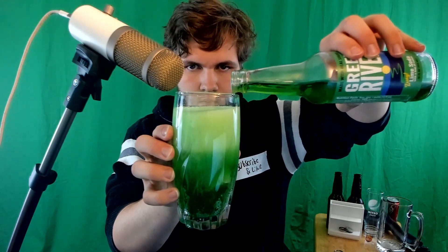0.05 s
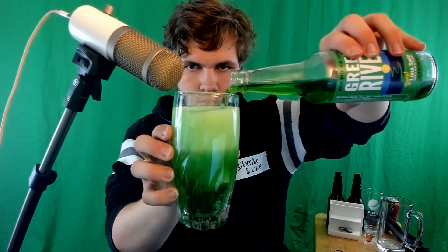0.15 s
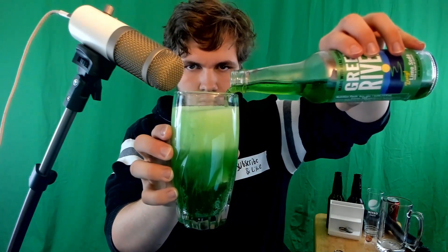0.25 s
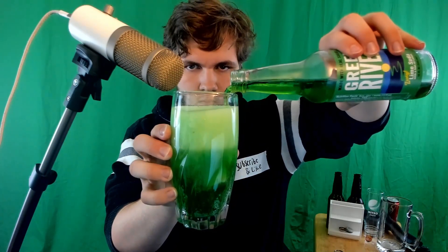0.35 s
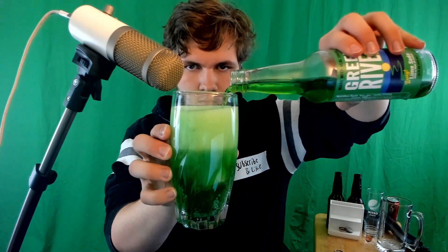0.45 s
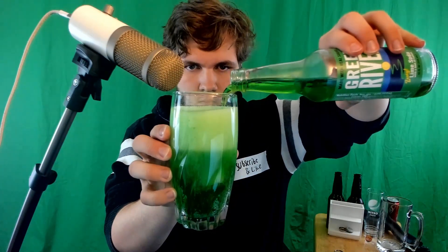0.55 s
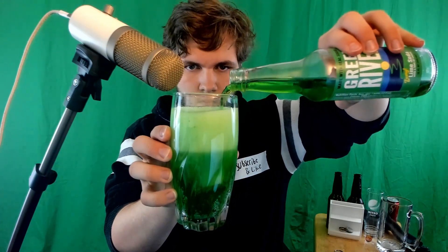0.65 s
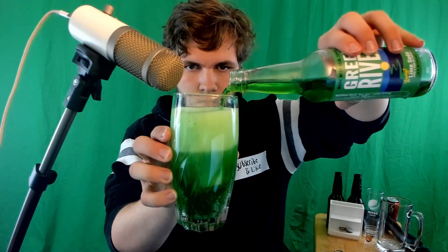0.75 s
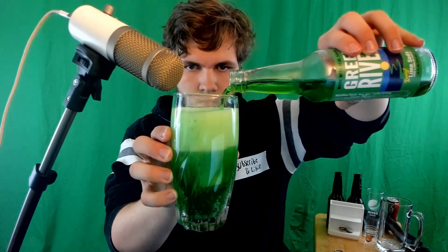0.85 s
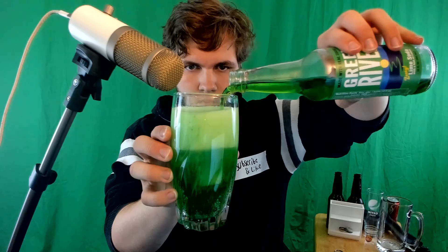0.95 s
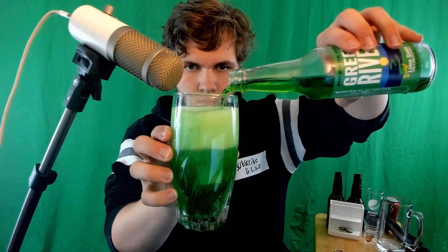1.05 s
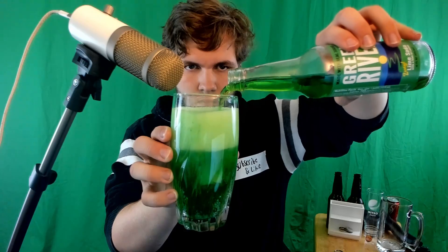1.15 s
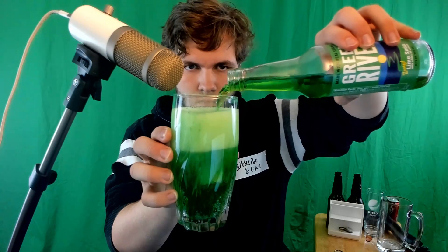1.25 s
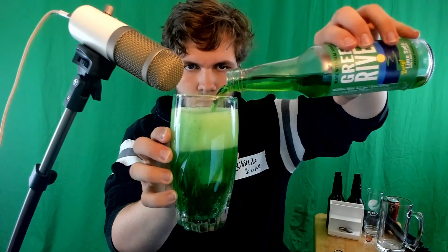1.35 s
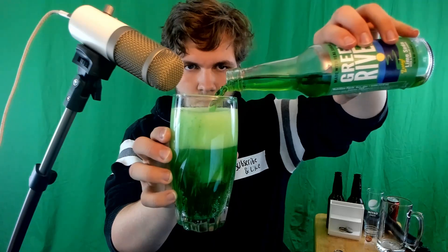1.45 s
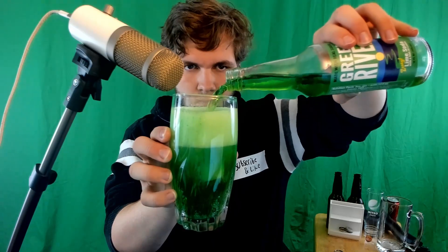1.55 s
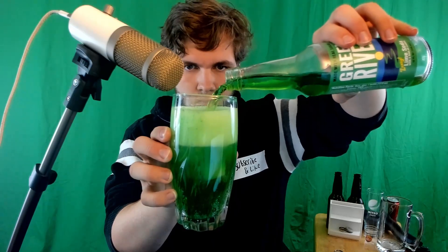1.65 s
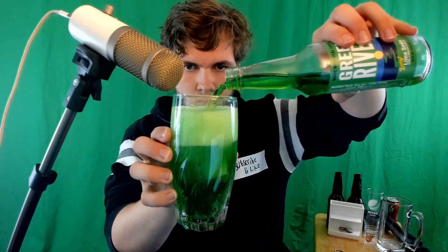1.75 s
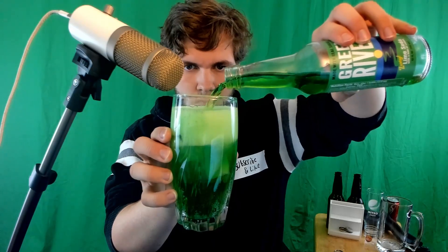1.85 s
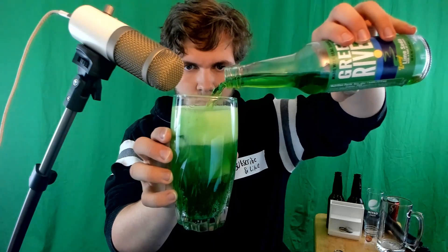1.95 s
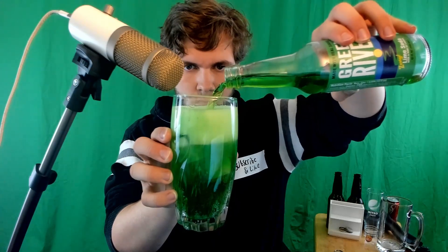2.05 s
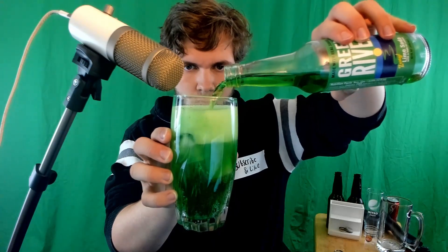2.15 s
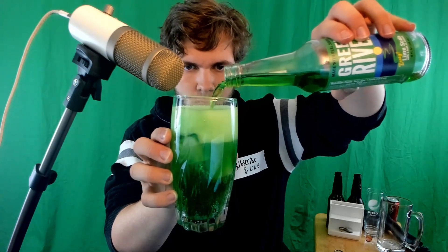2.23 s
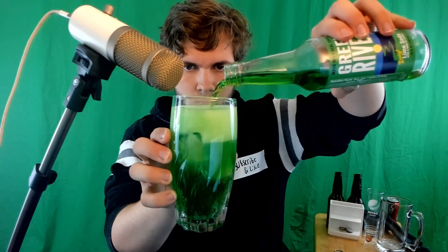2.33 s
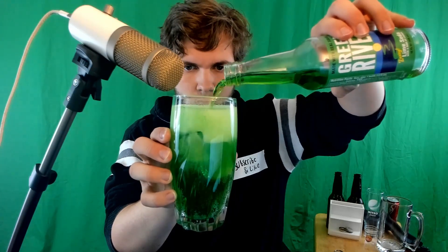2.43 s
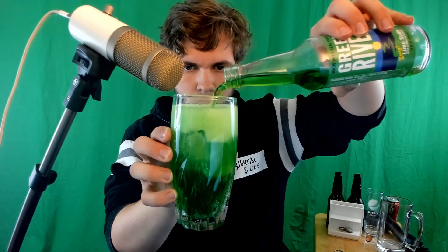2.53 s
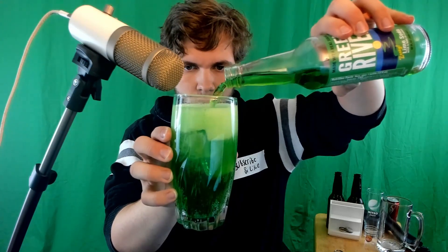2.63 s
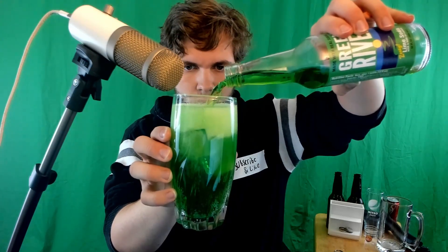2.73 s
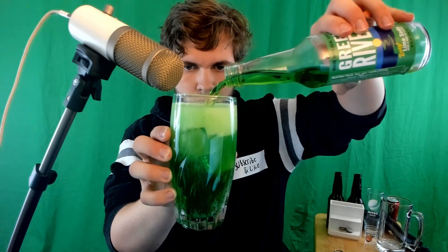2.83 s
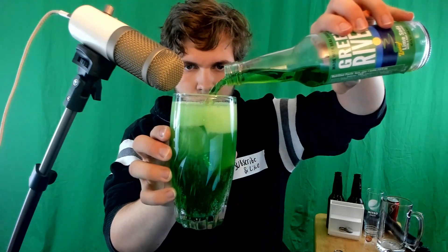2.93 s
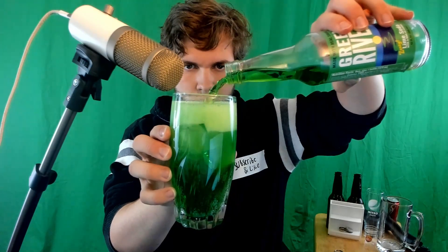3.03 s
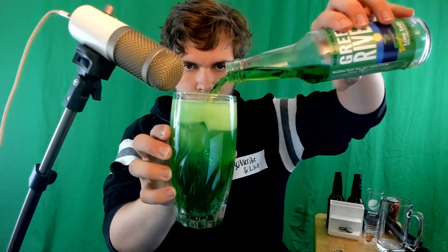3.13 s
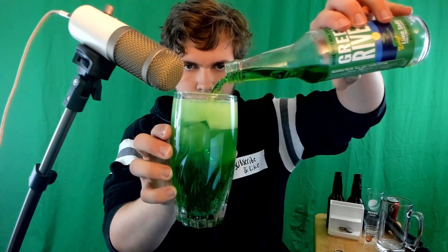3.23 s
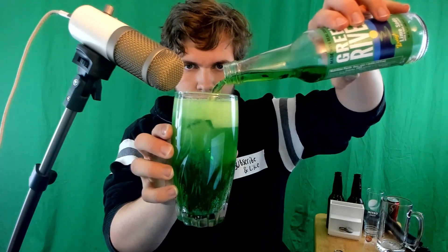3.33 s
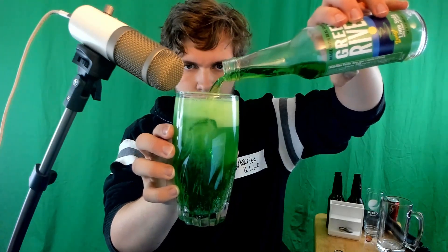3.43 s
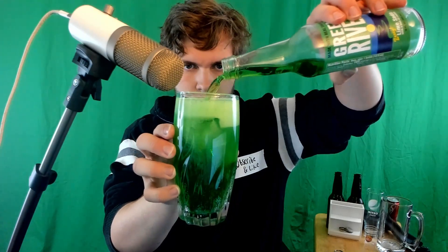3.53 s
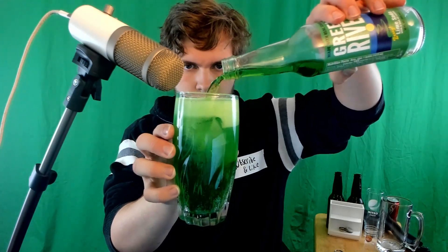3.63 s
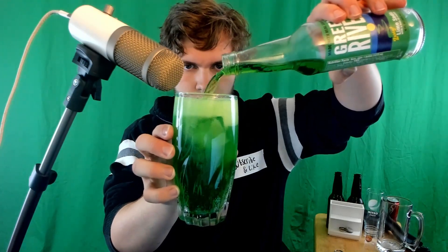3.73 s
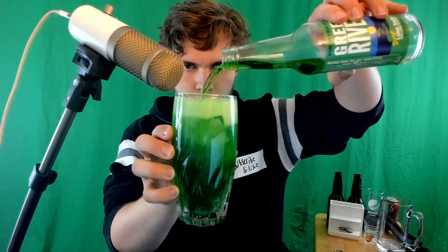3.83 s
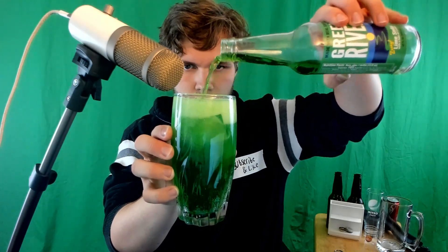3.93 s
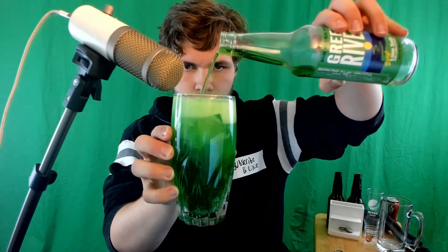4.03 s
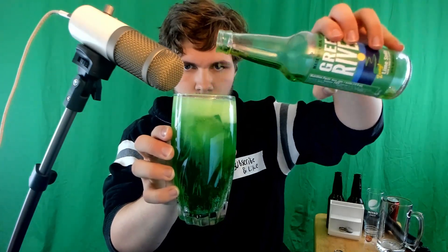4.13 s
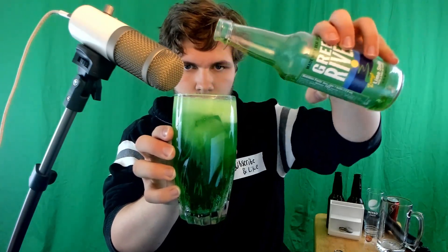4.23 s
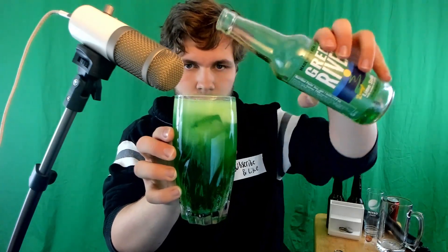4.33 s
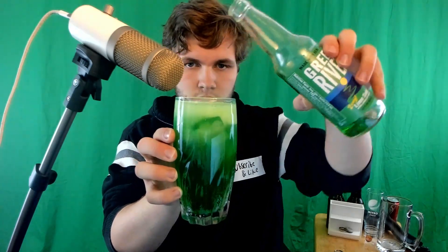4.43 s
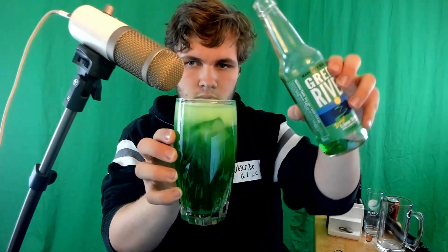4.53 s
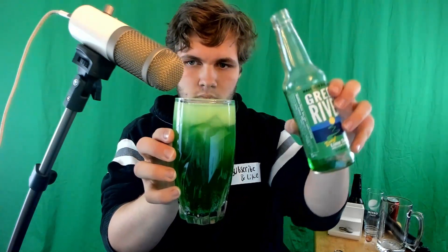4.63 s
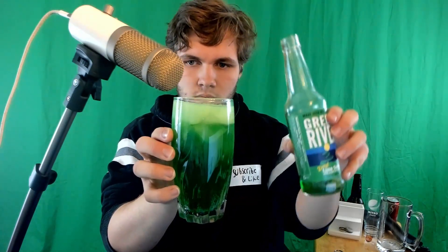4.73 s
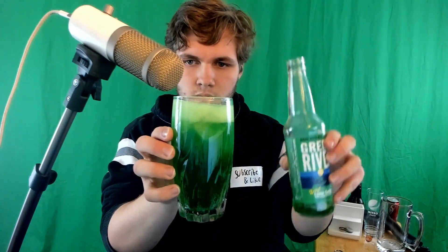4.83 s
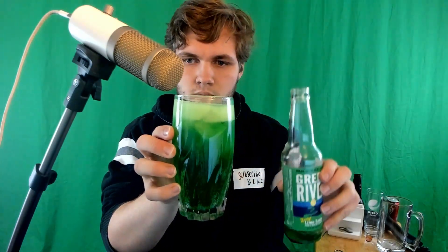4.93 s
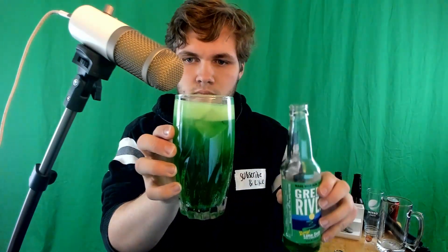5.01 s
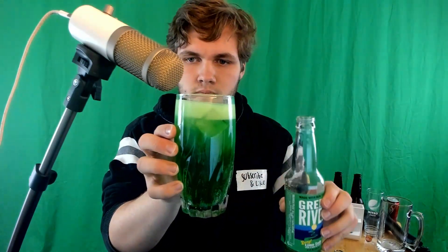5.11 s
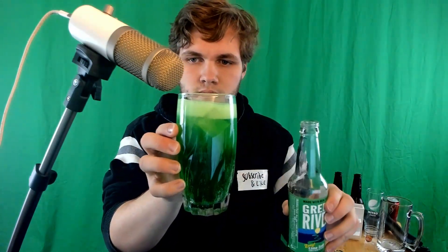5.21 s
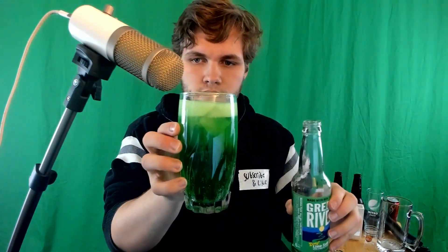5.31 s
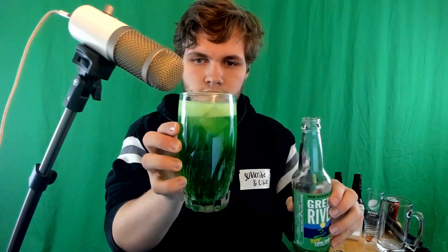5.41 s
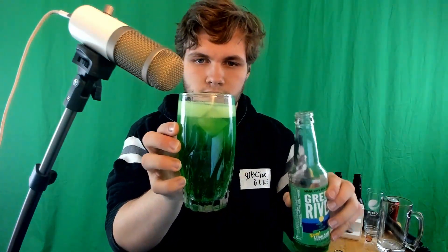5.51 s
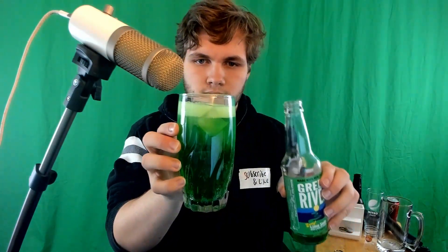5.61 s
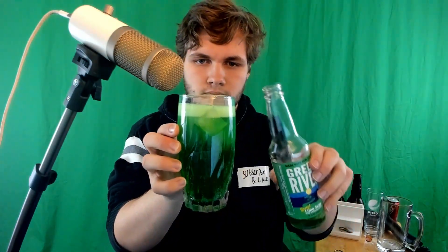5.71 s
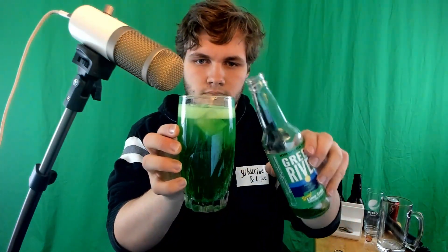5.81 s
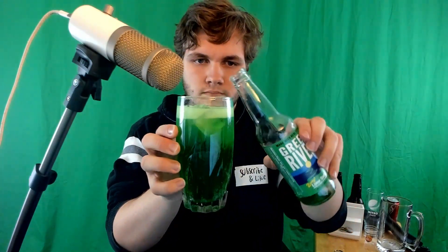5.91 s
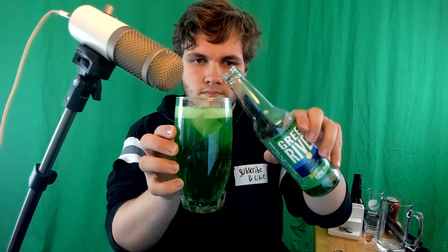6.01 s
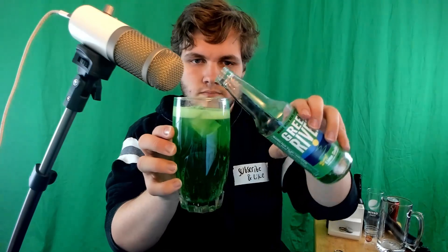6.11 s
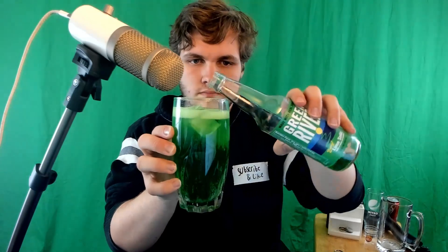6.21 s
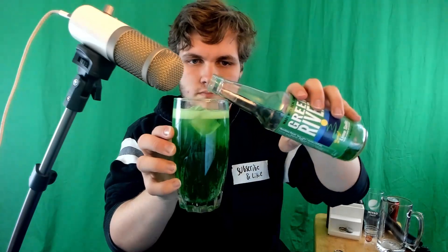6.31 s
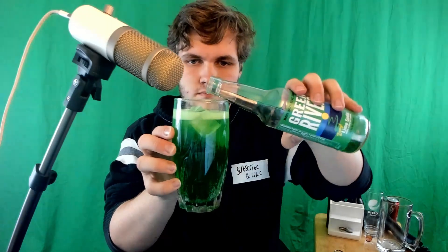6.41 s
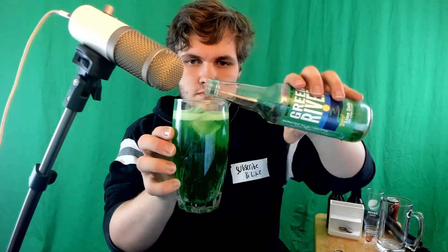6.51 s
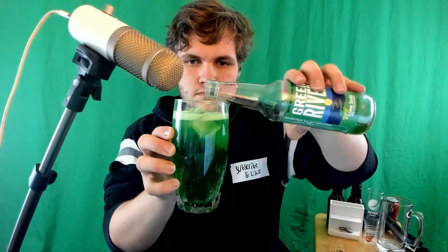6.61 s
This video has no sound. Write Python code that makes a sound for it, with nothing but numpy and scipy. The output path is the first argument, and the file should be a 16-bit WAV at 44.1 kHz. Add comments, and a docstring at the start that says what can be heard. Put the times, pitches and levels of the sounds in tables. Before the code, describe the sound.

Soda is poured gently into a tall glass of ice right by the microphone, making a dense, high fizz of tiny bubbles. A few larger bubbles tick and crackle slightly to the left near the start, and single bubbles ring briefly within the hiss. About halfway through, the fizz begins to die away as the pour ends and the foam clears. Very faint hand bumps and a low hum sit behind it in a quiet room.

```python
"""Soda poured gently into a tall glass of ice, close to the microphone, fizzing as the pour ends.
Thousands of tiny bubbles burst each second; their colour changes as the thick foam head thins and clears.
The air in the glass resonates, single bubbles sing, and a few large ones tick just to the left.
Hands bump softly, air stirs at the microphone, and a quiet room hums behind."""
import sys
import numpy as np
from scipy import signal
from scipy.fft import rfft, irfft, next_fast_len
from scipy.io import wavfile
from scipy.ndimage import map_coordinates

SR = 44100
rng = np.random.default_rng(int(sys.argv[2]) if len(sys.argv) > 2 else 0)


def wav_out(sig):
    """Save sig, one row per channel (or a flat mono array), as 16-bit PCM at SR to the path in sys.argv[1]."""
    wavfile.write(sys.argv[1], SR, np.round(np.clip(np.atleast_2d(sig).T, -1, 1) * 32767).astype(np.int16))


N = 293706
TIME = np.arange(N) / SR

# the fizz surges as a patch of foam gives way, or lulls:
# t/s, half length/s, level change/dB, treble tilt/(dB per octave)
FIZZ_SURGES = [(.25, .25, -1, 2.6), (1.53, 0.082, 1.5, 0), (1.823, 0.075, 1, .5), (2.084, 0.13, -1.2, 0),
               (3.855, 0.049, 0.6, 1.5), (4.305, 0.076, -1.5, -2.8), (4.5, 0.023, 3, -2),
               (4.696, 0.036, 3.5, 0), (5.35, 0.22, 3, 2.5), (5.83, .06, 0.7, -0.5), (5.956, 0.029, 1.2, 4),
               (6.36, 0.11, -1.6, 2.5), (6.615, 0.043, 3, 3.5)]


def amp(db):
    """Decibels to gain."""
    return 10 ** (np.asarray(db) / 20)


def unit(x):
    """Scale to rms 1."""
    return x / np.sqrt(np.mean(x ** 2) + 1e-20)


def along(points, hz):
    """Read (f/Hz, value) points on a log frequency axis."""
    freqs, values = np.transpose(points)
    return np.interp(np.log(hz + 1), np.log(freqs + 1), values)


def wobble(rate):
    """A smooth random curve with rate knots a second."""
    knots = rng.standard_normal(int(N * rate / SR) + 4)
    return map_coordinates(knots, [TIME * rate])


def swell(s, half):
    """A bell-shaped rise and fall around time s."""
    return np.exp(-0.5 * ((TIME - s) / half) ** 2)


def smooth_step(s, length):
    """A smooth step from 0 to 1 around time s."""
    return 0.5 + 0.5 * np.tanh((TIME - s) / length)


def resonances(modes, hz):
    """Gain in dB of a set of resonances and cancellations."""
    return sum(db / (1 + (2 * (hz - centre) / width) ** 2) for centre, width, db in modes)


def coloured(x, gain_db, size=8192):
    """Minimum-phase filter with the response gain_db(hz): every impulse rings after its onset."""
    gain = amp(gain_db(np.fft.rfftfreq(size, 1 / SR)))
    cepstrum = irfft(np.log(gain + 1e-9))
    cepstrum[1:size // 2] *= 2
    cepstrum[size // 2 + 1:] = 0
    response = irfft(np.exp(rfft(cepstrum)))
    return signal.fftconvolve(x, response)[:N]


def shaped(x, spectrum):
    """Filter x by a curve of (f/Hz, gain/dB) points."""
    return coloured(x, lambda hz: along(spectrum, hz))


def noise(spectrum):
    """Noise with a spectrum of (f/Hz, relative level/dB) points, rms 1."""
    return unit(shaped(rng.standard_normal(N), spectrum))


def bursts(per_second, scatter_db):
    """Randomly timed impulses of uneven size, rms 1."""
    happens = rng.random(N) < per_second / SR
    sizes = amp(scatter_db * np.clip(rng.standard_normal(N), -2, 2))
    return unit(happens * sizes * rng.choice([-1, 1], N))


def ringing(x, pitch_hz, width_hz):
    """x through a steep resonance whose pitch may move, rms 1."""
    carrier = np.exp(2j * np.pi * np.cumsum(pitch_hz) / SR)
    pole = np.exp(-np.pi * width_hz / SR)
    baseband = signal.lfilter([1], np.poly([pole, pole]), x / carrier)
    return unit((baseband * carrier).real)


def bubbles(spectrum, air_gap, per_second, scatter_db):
    """One population of bursting bubbles, heard through the air in the glass."""
    # resonances (+) and cancellations (-) across the glass: f/Hz, width/Hz, gain/dB
    glass_modes = [(1564, 110, -6.5), (1619, 164, 6), (1775, 510, 4), (2847, 66, 5.5), (3100, 183, -8)]

    def colour(hz):
        bass_loss = -20 * np.log10(1 + (250 / (hz + 1)) ** 2)  # tiny bubbles radiate no bass
        return along(spectrum, hz) + resonances(glass_modes, hz) + resonances(air_gap, hz) + bass_loss
    return unit(coloured(bursts(per_second, scatter_db), colour))


def surface_shares():
    """Each surface state's share of the fizz: it rises, holds and falls as the next takes over."""
    # thick foam, stream on ice, thin froth, open liquid:
    # full from t/s, full until t/s, rise/(dB per s), fall/(dB per s), relative floor/dB
    stages = [(0, 1.35, 10, 9, -34), (2.401, 2.902, 21, 21, -28), (3.154, 4.203, 12, 8.5, -9),
              (4.5, 6.66, 10.5, 5, -32)]
    shares = []
    for start, end, rise, fall, floor in stages:
        db = -rise * np.maximum(start - TIME, 0) - fall * np.maximum(TIME - end, 0)
        shares.append(amp(db) + amp(floor))
    return np.array(shares) / np.linalg.norm(shares, axis=0)


def brightened(hiss):
    """Bursts are dull under the foam; finer bubbles tilt the treble up as it clears and in surges."""
    foam_tilt, clear_tilt = -0.94, 0.83  # dB per octave above 4500 Hz
    tilt = foam_tilt + (clear_tilt - foam_tilt) * smooth_step(2.5, 0.31)
    tilt += sum(change * swell(s, half) for s, half, _, change in FIZZ_SURGES)
    tilt += 0.6 * wobble(6.3)
    hz, frame_s, spectra = signal.stft(hiss, SR, nperseg=256)
    octaves = np.log2(np.maximum(hz / 4500, 1))
    gain = amp(np.outer(octaves, np.interp(frame_s, TIME, tilt)))
    return signal.istft(spectra * gain, SR, nperseg=256)[1][:N]


def surface_ring():
    """A sharp resonance that drifts as the surface sways and jitters with the ripples."""
    # path of the resonance: t/s, f/Hz
    sway = [(0.0, 4700), (0.39, 4476), (1.7, 4460), (1.74, 4350), (2.48, 4620), (3.54, 4520), (3.66, 4296),
            (4.9, 4405), (5.49, 4270), (5.6, 4500)]
    pitch_hz = np.interp(TIME, *np.transpose(sway)) + 85 * wobble(22)
    return ringing(bursts(6000, scatter_db=3), pitch_hz, width_hz=150)


def fizz_level_db():
    """The fizz builds slowly as the glass fills and dies away once the stream thins, with surges on top."""
    full_s, full_db, build_db_per_s, fade_db_per_s = 2.85, -29, 0.5, 5
    late = TIME - full_s
    trend = full_db + build_db_per_s * np.minimum(late, 0) - fade_db_per_s * np.maximum(late, 0)
    surges = sum(db * swell(s, half) for s, half, db, _ in FIZZ_SURGES)
    return trend + surges + 0.43 * wobble(12) + 0.36 * wobble(30)


def fizz():
    """Tiny bubbles burst close to the microphone, thinning out as the foam clears to open liquid."""
    # burst spectrum in each state of the surface: f/Hz, relative level/dB
    foam = [(500, -24), (2400, -23), (3200, -19), (3900, -1.5), (5000, -0.5), (6500, -2), (9000, -10),
            (11500, -14), (13500, -19), (15500, -39)]
    stream = [(500, -23), (2400, -21.5), (3200, -21.5), (3900, -5.5), (5000, 1.5), (6500, 0.5),
              (9000, -8.5), (11500, -23.5), (13500, -35), (15500, -34)]
    froth = [(500, -23.5), (2400, -20.5), (3200, -20.5), (3900, -6.5), (5000, 0.5), (6500, -8),
             (9000, -20.5), (11500, -39.5), (13500, -35), (15500, -44)]
    liquid = [(500, -16), (2400, -24), (3200, -11), (3900, -1), (5000, 2.5), (6500, -8.5), (9000, -18),
              (11500, -30.5), (13500, -32), (15500, -38)]
    # resonances (+) and cancellations (-) of the air gap above each: f/Hz, width/Hz, gain/dB
    foam_air = [(2808, 85, 9.5), (4280, 100, -12.5), (4500, 830, 9.5), (7670, 345, -29), (8210, 110, 4),
                (8160, 120, -8), (9300, 510, 6.5), (9970, 400, -7), (10400, 400, 0.5)]
    stream_air = [(1730, 210, -1.5), (2550, 250, 2.5), (4320, 670, 13.5), (8300, 1000, 3),
                  (10160, 260, -10), (10400, 550, 7)]
    froth_air = [(2540, 440, -7.5), (4300, 1300, 10), (5910, 410, -12.5), (7330, 320, -21),
                 (8320, 770, 7.5), (10000, 400, 5), (11400, 350, -4), (13542, 894, 4)]
    liquid_air = [(4200, 1100, 8.5), (4380, 170, -3), (7400, 220, -14.5), (8100, 260, -6),
                  (8920, 1100, 12.5), (9870, 210, -17), (10460, 1300, 10), (11900, 600, -1)]
    shares = surface_shares()
    states = [bubbles(foam, foam_air, per_second=22000, scatter_db=3.5),
              bubbles(stream, stream_air, per_second=28000, scatter_db=3.5),
              bubbles(froth, froth_air, per_second=16000, scatter_db=4.0),
              bubbles(liquid, liquid_air, per_second=10000, scatter_db=2.5)]
    hiss = brightened(np.sum(shares * states, axis=0))
    ring = surface_ring()
    ring_db, foam_damping_db = -5, 4  # against the hiss
    ring_gain = amp(ring_db - foam_damping_db * shares[0] + 2.2 * wobble(18))  # ripples make it flare
    blend = (hiss + ring_gain * ring) / np.hypot(1, ring_gain)
    return amp(fizz_level_db()) * blend


def room_tone():
    """The quiet room behind the glass: steady low noise and a slightly unsteady hum."""
    # room noise: f/Hz, relative level/dB
    room_spectrum = [(20, -3.5), (55, 3), (80, 0.5), (150, 0), (220, -2), (390, -3.5), (500, -18.5),
                     (1000, -12), (2500, -46), (15000, -41)]
    # tones of the hum: f/Hz, level/dB
    hum_tones = [(56, -67.5), (120, -74), (211, -77.5), (258.4, -70), (344.5, -73.5), (374, -89),
                 (410, -79)]
    background = amp(-63) * noise(room_spectrum)
    hum = sum(amp(db) * unit(np.sin(2 * np.pi * hz * TIME + 0.49 * wobble(4.05))) for hz, db in hum_tones)
    return background + hum


def draught():
    """Slow air rumbles at the microphone and calms as the pour thins."""
    # stronger puffs of air: t/s, half length/s, level/dB
    puffs = [(1.658, 0.067, -56), (3.073, 0.043, -60)]
    pour_db, rest_db, swing_db = -64.5, -69.5, 3
    level_db = pour_db + (rest_db - pour_db) * smooth_step(3.3, 0.2) + swing_db * wobble(6.5)
    flow = amp(level_db) + sum(amp(db) * swell(s, half) for s, half, db in puffs)
    return flow * noise([(10, -11), (22, 3.5), (40, 1), (70, -9.5), (200, -46), (1000, -73)])


def whistles():
    """A single bubble sings out of the fizz for a moment, gliding as it changes size."""
    # singing bubbles: t/s, half length/s, f/Hz, glide/(Hz per s), level/dB
    singers = [(.19, 0.039, 4690, 2, -38), (1.874, .06, 4250, -600, -36),
               (3.141, 0.055, 4303, -3000, -35.5), (3.627, .04, 4320, -2000, -40),
               (3.95, .16, 4120, -300, -38.5), (4.33, 0.087, 3940, -200, -48),
               (5.36, 0.069, 4370, 0, -44.5), (6.123, 0.055, 4190, -1400, -48),
               (6.445, 0.086, 4815, 900, -48), (6.582, 0.031, 4280, 600, -52)]
    out = np.zeros(N)
    for s, half, hz, glide, db in singers:
        pitch_hz = hz + glide * np.clip(TIME - s, -2 * half, 2 * half)
        out += amp(db) * swell(s, half) * ringing(rng.standard_normal(N), pitch_hz, width_hz=123)
    return out


def handling():
    """Hands on the glass and bottle make dull low swells."""
    # soft bumps: t/s, half length/s, level/dB
    bumps = [(.36, 0.041, -57), (0.915, 0.075, -60), (1.655, .08, -62), (1.83, 0.058, -58.5),
             (3.1, 0.14, -68), (5.35, 0.42, -65.5)]
    envelope = sum(amp(db) * swell(s, half) for s, half, db in bumps)
    return envelope * noise([(30, -6), (70, -0.5), (140, 0), (220, -9), (450, -25), (2000, -55)])


def pops():
    """A large bubble bursts with a sharp tick and a short dull puff."""
    # large bubbles: t/s, relative tick level/dB, relative puff level/dB
    large_bubbles = [(.378, -17, -42.5), (0.41, -42, -43), (0.448, -33, -45), (.515, -26, -43.5),
                     (0.537, -21, -45), (0.5457, -19, -49)]
    tick_colour = [(300, -21), (1800, -10.5), (3000, -2), (6000, 0), (9000, -7), (15000, -14)]
    puff_colour = [(60, -7), (300, -3), (1200, -2.5), (3000, -6), (6000, -9), (15000, -35)]
    ticks, puffs = np.zeros(N), np.zeros(N)
    t = np.arange(SR // 20) / SR
    decay = amp(-60 * t / 0.04)
    for s, tick_db, puff_db in large_bubbles:
        start = round(s * SR)
        ticks[start] = amp(tick_db + 12.5)
        puffs[start:start + len(t)] += amp(puff_db + 14) * decay * rng.standard_normal(len(t))
    return shaped(ticks, tick_colour) + shaped(puffs, puff_colour)


def crackles():
    """Brief patches of bright crackle, heard to the left."""
    # patches of crackle: t/s, half length/s, level/dB
    crackle_patches = [(0.451, 0.016, -38), (0.525, 0.029, -40), (0.878, 0.021, -37.5), (.96, 0.017, -34.5),
                       (1.852, 0.012, -44)]
    envelope = sum(amp(db) * swell(s, half) for s, half, db in crackle_patches)
    colour = [(300, -10), (2500, -10.5), (4500, 8), (7000, 1), (11000, -7), (15000, -15)]
    return envelope * unit(shaped(bursts(2500, scatter_db=-1), colour))


def flurries():
    """Brief rushes of extra bubbles, brighter than the rest."""
    # rushes of fresh fizz: t/s, half length/s, level/dB, centre f/Hz, width/Hz
    rushes = [(1.79, 0.1, -33.5, 6100, 1800), (1.8, .04, -38.5, 8100, 2000), (5.95, 0.033, -55, 8640, 1400)]
    out = np.zeros(N)
    for s, half, db, centre, width in rushes:
        band = lambda hz: -20 * np.log10(1 + (2 * (hz - centre) / width) ** 4)
        out += amp(db) * swell(s, half) * unit(coloured(bursts(8300, scatter_db=4.5), band))
    return out


def wall_echoes(glass):
    """Faint, short echoes off the walls reach the microphone as a side signal."""
    # stereo width of the fizz: f/Hz, side over mid/dB
    stereo_width = [(500, -33), (1500, -45.5), (3000, -44), (4500, -70), (8000, -50), (13000, -27.5)]
    t = np.arange(SR // 8) / SR
    walls = rng.standard_normal(len(t)) * amp(-60 * t / 0.085)
    echo = signal.fftconvolve(glass, walls / np.linalg.norm(walls))[:N]
    return shaped(echo, stereo_width)


def scene():
    """The glass stands close and centred, nearly mono; pops and crackle sit to the left."""
    glass = fizz() + flurries() + whistles()
    side = wall_echoes(glass)
    stereo_glass = np.array([glass + side, glass - side])
    left_ticks_and_crackle = (pops() + crackles()) * amp([[0], [-14]])
    return stereo_glass + left_ticks_and_crackle + handling() + room_tone() + draught()


def record(dry):
    """The recorder keeps nothing above its band limit."""
    top_hz = 15750
    size = next_fast_len(N + SR // 4)
    passband = np.fft.rfftfreq(size, 1 / SR) < top_hz
    return irfft(rfft(dry, size) * passband, size)[:, :N]


dry = scene()
out = record(dry)
wav_out(out)
```